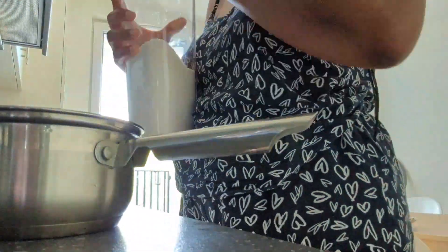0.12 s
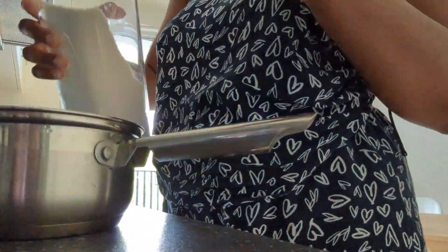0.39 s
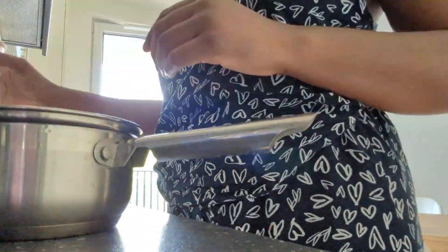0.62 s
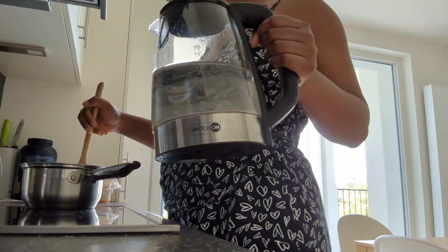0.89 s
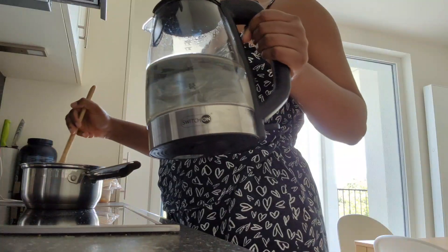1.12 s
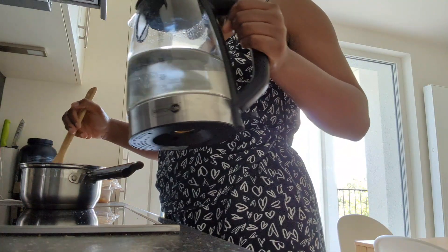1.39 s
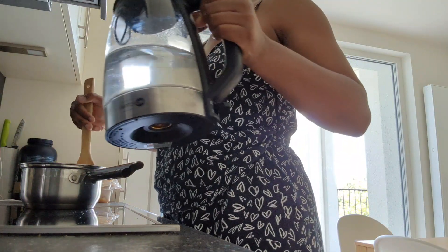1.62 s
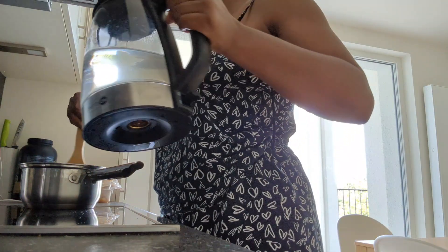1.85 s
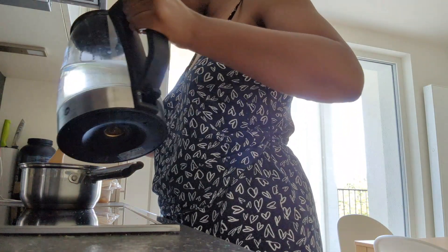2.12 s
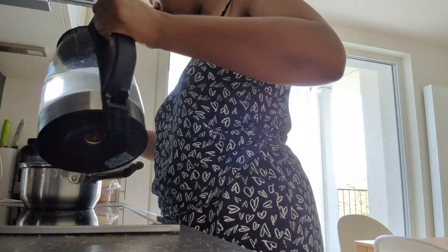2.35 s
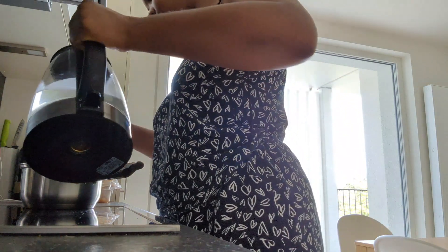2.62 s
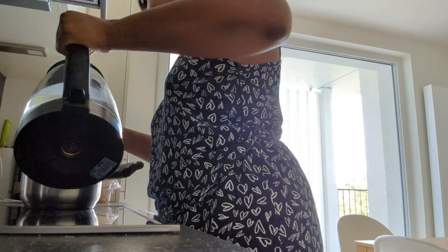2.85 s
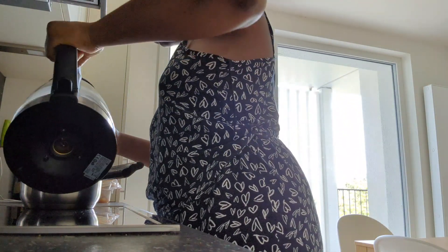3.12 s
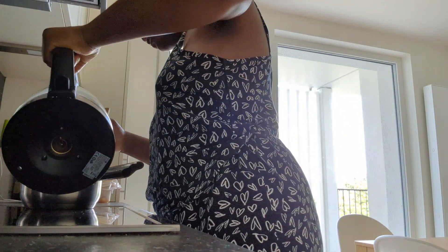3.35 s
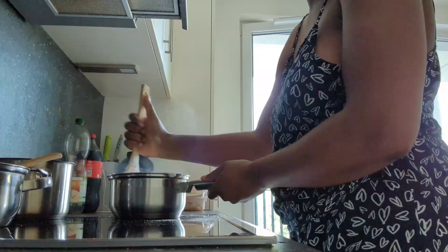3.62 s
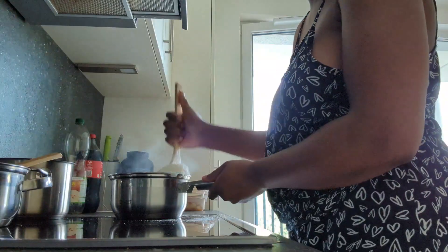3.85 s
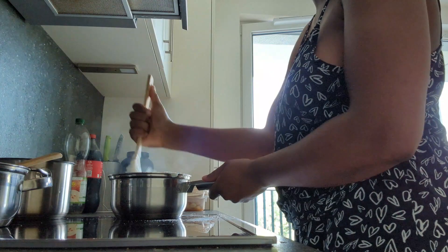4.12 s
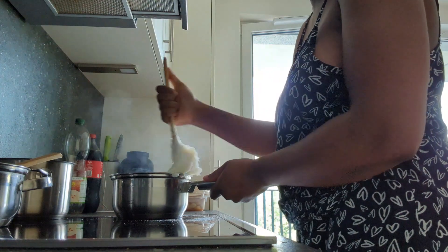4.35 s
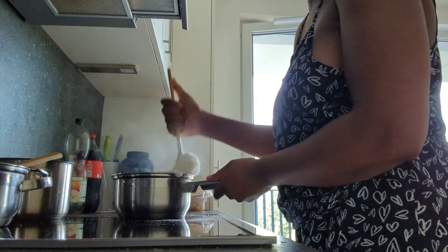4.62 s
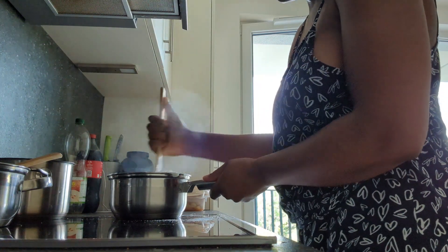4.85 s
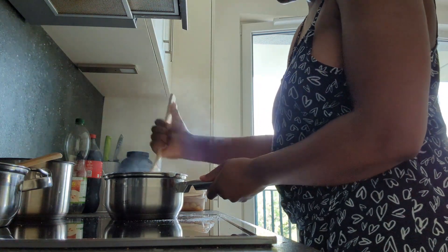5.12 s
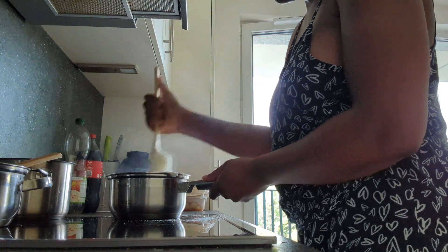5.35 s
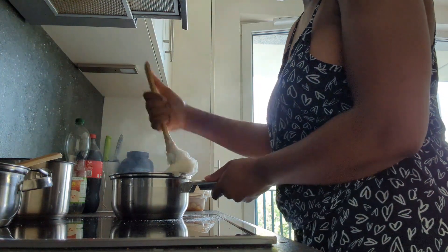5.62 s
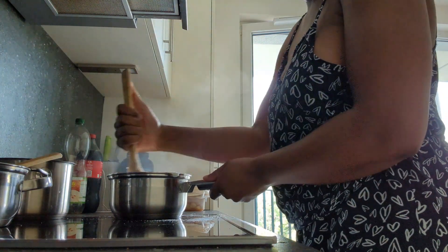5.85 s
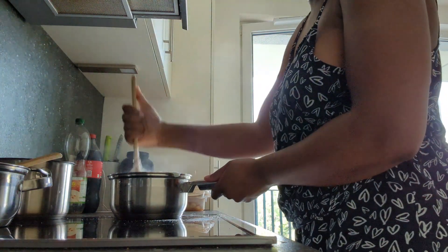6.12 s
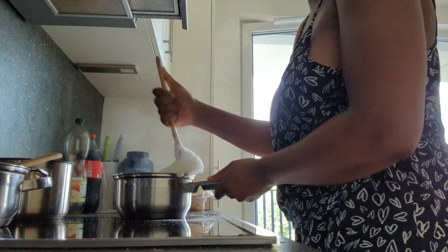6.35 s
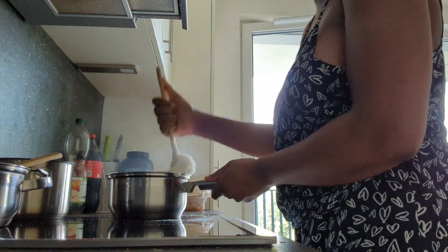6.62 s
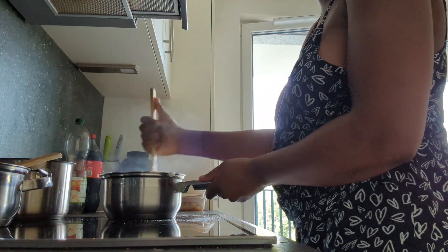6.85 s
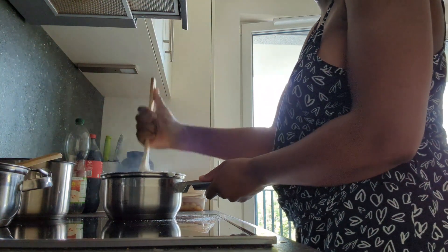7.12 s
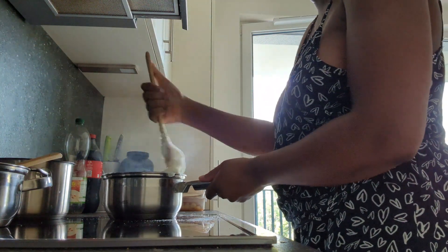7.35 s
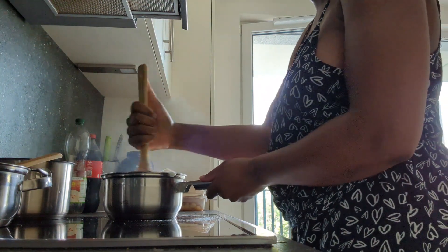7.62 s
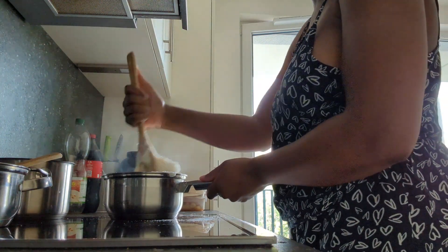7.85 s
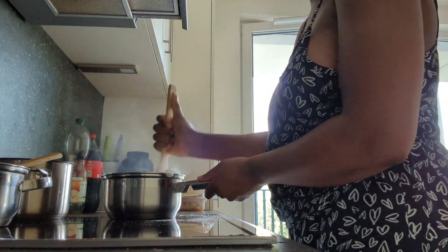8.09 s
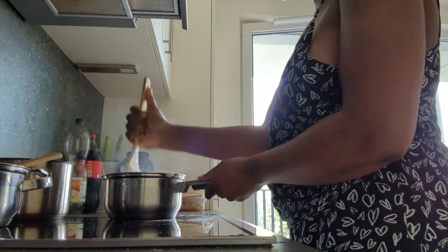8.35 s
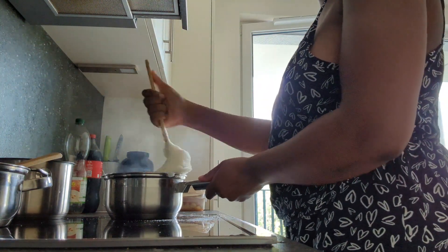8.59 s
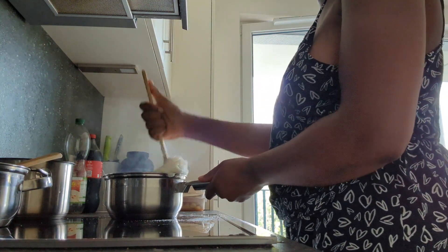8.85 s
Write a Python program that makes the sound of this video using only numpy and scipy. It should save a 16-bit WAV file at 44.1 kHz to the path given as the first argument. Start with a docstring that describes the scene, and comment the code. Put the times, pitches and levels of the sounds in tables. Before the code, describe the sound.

A kitchen extractor fan roars steadily while a jar clinks and is set down, then a wooden spoon beats stiff dough in a steel pot.

```python
"""A kitchen extractor fan roars and hums through its duct, heard by a phone from three stands in turn, with abrupt jumps.
The roar is noise shaped by duct resonances; under it lie a steady mains tone and, from the second stand, a deep hum.
First a jar clinks, scrapes and is set down: struck modes and grainy friction noise. Later a wooden spoon beats
dough in a steel pot: sagging deep tones thump the hob, and now and then the pot wall rings. Bright ticks dot the scene."""
import sys
import numpy as np
from scipy import signal
from scipy.fft import rfft, irfft, next_fast_len
from scipy.io import wavfile
from scipy.ndimage import uniform_filter1d

SR = 44100
rng = np.random.default_rng(int(sys.argv[2]) if len(sys.argv) > 2 else 0)


def attenuation_scalar(level_db):
    """Turn a level in dB into a linear amplitude multiplier (20 dB per decade)."""
    decades = np.asarray(level_db, float) / 20
    return 10 ** decades


def store_wav(level_fs):
    """Save 16-bit WAV to argv[1]."""
    pcm = np.round(np.clip(np.atleast_2d(level_fs), -1, 1) * 32767)
    wavfile.write(sys.argv[1], SR, pcm.T.astype(np.int16))


N = 395882

TIME = np.arange(N) / SR  # s
SIZE = next_fast_len(N)
FREQ = np.arange(SIZE // 2 + 1) * SR / SIZE + 1e-3  # Hz, kept above zero for the logarithm

# The three stands: [start t/s, air level/dB, mains tone level/dB, left port lag/samples]
STANDS = [(0, -29, -51, 1.7), (0.7986, -33, -46, 10), (3.633, -26.5, -44, 6.5)]
# Broad colour of the air noise: [f/Hz, density/dB per Hz at stand 1, at stand 2, at stand 3]
AIR_COLOUR = [(30, -13, -31, -29), (42, -2, -9, -11), (60, -7.5, -9, -5.5), (91, 0.5, -4, -1),
              (207, -3.5, -13.5, -3), (264, -13.5, -16, -10.5), (408, -12.5, -16, -15),
              (738, -14.5, -19.5, -13.5), (1235, -15, -25.5, -18.5), (2400, -30, -28.5, -23.5),
              (3340, -39, -39, -32.5), (4980, -46, -46, -39), (10500, -58, -57.5, -47),
              (15700, -57, -58, -50)]
# Duct and room resonances, dips negative: [f/Hz, width/Hz, level/dB at stand 1, at stand 2, at stand 3]
DUCT_RESONANCES = [(73.2, 5.5, 8.5, 8, 5.5), (83.7, 6, -7, 1.5, -3), (104, 9.7, -3.5, 2.5, -2),
                   (123.4, 10.8, 1, 7, 4.5), (150, 5.2, -1, -1, -9.5), (162, 7.4, -3, 5.5, 7),
                   (168.7, 6.8, 0, -2, -5), (189, 9.4, -2.5, 8.5, 5.5), (211, 8.3, -4, 6.5, 0.5),
                   (234.6, 13.3, -2, -9.5, -5.5), (259.6, 20.5, 7.5, 5, 2), (367.5, 61, 1.5, 2.5, 7.5),
                   (404, 5.7, -6, 10.5, 8), (502, 108, 3.5, -5.5, -4), (623, 41, -2, -5.5, -9),
                   (682.4, 27, 6, 5.5, 5.5), (725, 13.6, 2.5, 8, 9), (773, 10.6, 7, -5, -5),
                   (830, 41, -1.5, 5.5, 3), (952, 120, -1.5, -1.5, -2), (1105, 127, 1, 6.5, 5),
                   (1273, 45, -8, -2, -9), (1356, 59, 2.5, 5.5, 3), (1495, 7.4, 7, 6.5, 6.5),
                   (1637, 91, -13, -3, -2.5), (1734, 5.2, -7, -6, 11.5), (1837, 89, 6.5, 0, 4),
                   (1967, 6.3, 7, 4, 10), (2286, 86, -8, 0.5, 5.5), (3330, 570, 5.5, 4, 4),
                   (6380, 180, -4, -3, -3.5), (8000, 2200, 2, 2.5, 2), (9100, 2500, 2.5, 2.5, 1.5),
                   (11080, 860, 6, 5.5, 4.5)]
# Level of the deep hum, wavering irregularly, at times within a tenth of a second: [t/s, level/dB]
HUM_LEVEL = [(.8, -39), (.93, -30), (1.5, -37), (1.71, -28), (1.87, -35), (2.4, -38), (3.1, -30),
             (3.62, -44), (3.64, -34), (4.45, -27.5), (4.8, -32.5), (5.56, -26), (5.78, -32.5),
             (6.1, -26.5), (6.75, -31.5), (7.2, -28), (8.5, -35), (8.6, -22), (8.98, -34)]
# Brief dip of the fan at the first jump between stands: (from t/s, to t/s, level/dB)
FAN_DIP = (.7984, .8163, -6)
# Likeness of the two ports, negative = opposed: [f/Hz, likeness/-1 to 1 at stand 1, likeness later]
PORT_LIKENESS = [(100, .98, 0.97), (200, 0.88, 0.98), (400, 0.68, 0.84), (604, 0.76, 0.67),
                 (850, 0.53, 0.65), (1190, 0.12, 0.34), (1510, .38, -0.36), (2260, 0.14, -0.26),
                 (3200, -0.15, -0.19), (4500, -0.0072, -0.17), (7000, -.04, -0.11), (10500, -0.049, 0.0084),
                 (15000, .03, -.07)]
# Balance of the two ports: [f/Hz, left minus right level/dB]
PORT_BALANCE = [(60, -2), (110, -2), (200, -3.5), (380, -1.5), (700, -2), (1290, 1), (2380, 3.5), (4400, 2),
                (8120, -2.5), (15000, -1.5)]
# Contacts of the scraping jar: [t/s, level/dB, fade/dB per s]
SCRAPE_CONTACTS = [(0, -31.5, 250), (.43, -29, 430), (.466, -23, 1200), (.476, -27, 900), (.486, -28, 600),
                   (.52, -30.5, 700), (0.544, -35, 500), (.66, -32, 350)]
# Colour of the scrape: [f/Hz, density/dB per Hz]
SCRAPE_COLOUR = [(150, -30), (300, -1), (600, -5), (1300, -5.5), (2200, -9), (3300, -19.5), (4700, -29),
                 (5800, -33), (7300, -36), (15000, -53)]
# Blows on the jar, of the jar on the worktop, on the pot wall:
# [t/s, peak level before the tail/dB, contact/ms, favoured f of the struck spot/Hz]
JAR_CLINKS = [(.4216, -18, 0.023, 9000), (.4224, -7.5, 0.046, 1000), (.4243, -7.5, 0.079, 700)]
WORKTOP_THUDS = [(.6572, -14, .9, 150), (.6582, -7.5, 0.28, 350), (.6625, -12.5, 0.34, 700),
                 (.6755, -20, .5, 350), (.690, -22, .4, 450)]
POT_KNOCKS = [(4.002, -13.5, 0.11, 2000), (4.88, -18.5, 1.4, 350), (5.506, -18, 1.8, 250),
              (5.997, -20.5, 0.26, 900), (6.4143, -15.5, 0.076, 2100), (6.89, -22, 0.31, 900),
              (6.9175, -21, 0.085, 2950), (7.047, -24, 0.064, 2900), (7.5755, -15.5, 0.048, 2400)]
# Ringing modes of the jar, the worktop and the pot: [f/Hz, level/dB, t60/s]
JAR_MODES = [(504, 1.5, 0.0075), (1230, -2.5, 0.015), (1550, -8.5, 0.0097), (2250, -18, .015),
             (2900, -7.5, 0.019), (3320, -12, 0.014), (4050, -6, 0.017), (5130, -14, 0.014),
             (6480, -4, 0.015), (7100, -7, 0.016), (7840, -7, 0.015), (8670, -8, .015), (9600, 0, .015),
             (11240, -9, 0.014), (13000, -9, .015), (14400, -7, .015)]
WORKTOP_MODES = [(70, -18, 0.087), (129, 6, 0.028), (192, 3, 0.042), (310, 9.5, 0.035), (410, 5, 0.041),
                 (490, 2.5, 0.037), (650, 4, 0.049), (880, -2, 0.044), (1100, -1, 0.042), (1430, -1, 0.038),
                 (2000, -16, .025), (2444, -18, .03)]
POT_MODES = [(191, -14, 0.093), (360, 0, 0.032), (682, 4.5, 0.031), (1035, -0.5, 0.069), (1400, -3, 0.016),
             (1767, -8.5, 0.026), (2210, 0, 0.017), (2900, -1.5, 0.018), (3900, -6, 0.012),
             (5532, -20, 0.0094), (7500, -7, .008)]
# Small bright ticks and fizzes: [t/s, peak level/dB, f that sets the band/Hz, decay constant/ms]
TICKS = [(1.9663, -32, 7500, 3.8), (3.404, -50, 11980, 5.8), (3.4708, -43, 7400, 3.6),
         (3.516, -37, 6460, 1.28), (3.5238, -39, 7610, 2.7), (4.922, -37, 10500, 13),
         (5.932, -37, 11000, 5), (5.996, -26, 4500, 2.5), (7.705, -38, 13000, 8), (8.038, -28, 8000, 5)]
# Strokes that shake the hob: [t/s, drive level/dB]
HOB_STROKES = [(3.969, -23), (4.224, -32), (4.596, -33), (4.888, -19), (5.201, -28), (5.517, -16.5),
               (5.876, -25), (6.269, -26), (6.589, -21), (6.895, -18.5), (7.249, -26), (7.612, -27),
               (8.44, -31)]
# Steps of the waveform around the jumps between stands: [t/s, step/full scale]
WAVE_STEPS = [(0.7983, -0.05), (.8028, -0.022), (0.8163, -0.042), (3.6312, -0.03), (3.634, -0.063),
              (3.6421, 0.081)]


def table(points, axis=1):
    """One column of (Hz, value, ..) rows, read at every frequency along a log axis."""
    columns = np.transpose(points)
    return np.interp(np.log(FREQ), np.log(columns[0]), columns[axis])


def coloured(db):
    """Noise of rms 1, its spectrum shaped in dB per Hz."""
    noise = irfft(rfft(rng.standard_normal(SIZE)) * attenuation_scalar(db), SIZE)[:N]
    return noise / np.std(noise)


def walk(rate):
    """Random levels drawn rate times a second and slewed from one to the next; spread about 0.4."""
    hold = int(SR / rate)
    steps = np.repeat(rng.standard_normal(N // hold + 1), hold)
    return 0.48 * uniform_filter1d(steps, hold)[:N]


def ports(direct, diffuse, lag, axis=2):
    """Two microphone ports: mostly alike in the bass, where the left hears it lag samples later, unlike in the treble."""
    like = np.clip(table(PORT_LIKENESS, axis=axis), -1, 1)
    tilt = attenuation_scalar(table(PORT_BALANCE) / 2)
    direct, diffuse = rfft(direct, SIZE), rfft(diffuse, SIZE)
    # part of the difference is the same sound arriving off nearby surfaces, the rest is diffuse
    near = rng.standard_normal(1024) * np.exp(-TIME[:1024] / 0.01)
    near = rfft(near / np.sqrt(np.sum(near ** 2)), SIZE)
    near_share = 0.24  # of the power
    difference = np.sqrt(near_share) * direct * near + np.sqrt(1 - near_share) * diffuse
    shared = np.sqrt((1 + like) / 2) * direct
    own = np.sqrt((1 - like) / 2) * difference
    delay = lag / SR / (1 + (FREQ / 700) ** 2)  # s, shrinking above 700 Hz
    left = (shared + own) * np.exp(-2j * np.pi * FREQ * delay)
    return irfft(np.array([left * tilt, (shared - own) / tilt]), SIZE)[:, :N]


def add(out, s, sound):
    """Mixes a short sound in at s seconds."""
    i = int(s * SR)
    out[..., i:i + sound.shape[-1]] += sound[..., :N - i]


def blows(events, modes, crack_db, tail_db, tail_s, spot_db_per_octave):
    """Each blow cracks, pushes for its contact time and rings the modes; the walls return a short noisy tail."""
    out, t = np.zeros((2, N)), np.arange(SR // 4) / SR
    hz, db, t60 = np.transpose(modes)[:, :, None]
    # neighbouring modes start in opposite directions; low ones take longer to build up
    sign = -(-1) ** np.arange(len(modes))[:, None]
    build_up = 1 - np.exp(-t * hz * 9.3)
    rings = sign * build_up * attenuation_scalar(db - 60 * t / t60) * np.sin(2 * np.pi * hz * t)
    for s, peak_db, contact_ms, spot_hz in events:
        octaves_away = np.abs(np.log2(hz / spot_hz))
        ring = np.sum(rings * attenuation_scalar(-spot_db_per_octave * octaves_away), axis=0)
        crack = attenuation_scalar(crack_db) * rng.standard_normal(len(t)) * np.exp(-t / 0.0023)
        push = np.exp(-t[:400] / (max(contact_ms, 0.01) / 1000))
        hit = signal.fftconvolve(ring + crack, push)[:len(t)]
        hit = hit * attenuation_scalar(peak_db) / np.max(np.abs(hit))
        # the tail begins after 5 ms and is duller than the blow
        walls = rng.standard_normal((2, len(t))) * attenuation_scalar(-60 * t / tail_s) * (t > 0.005)
        walls = signal.lfilter([1], [1, -0.5], walls)
        walls = walls / np.sqrt(np.sum(walls[0] ** 2))
        tail = signal.fftconvolve(hit[None], walls)[:, :len(t)]
        add(out, s, hit + attenuation_scalar(tail_db) * tail)
    return out


def jumps():
    """The waveform steps suddenly and relaxes within a few milliseconds."""
    out, t = np.zeros(N), np.arange(SR // 50) / SR
    for s, step in WAVE_STEPS:
        add(out, s, step * np.exp(-t / 0.0021))
    return out


def ticks():
    """Short bursts of band-passed noise that die away exponentially."""
    out, t = np.zeros((2, N)), np.arange(SR // 20) / SR
    for s, peak_db, hz, decay_ms in TICKS:
        edges = [hz * 0.3, min(hz * 1.12, 16000)]
        band = signal.butter(2, edges, "band", fs=SR, output="sos")
        noise = rng.standard_normal((2, len(t))) * np.exp(-1000 * t / decay_ms)
        burst = signal.sosfilt(band, noise)
        add(out, s, attenuation_scalar(peak_db) * burst / np.max(np.abs(burst)))
    return out


def scrape():
    """The jar's friction noise: each contact rises in milliseconds and fades, in dense grains of very uneven size."""
    rise_s = 0.0023  # ends at the listed time
    level = np.zeros(N)
    for s, db, fade in SCRAPE_CONTACTS:
        since = TIME - s
        level += attenuation_scalar(db - fade * np.maximum(since, 0)) * np.clip(1 + since / rise_s, 0, 1)
    grain = level * attenuation_scalar(4 * walk(700) + 5 * walk(250))
    colour = table(SCRAPE_COLOUR)
    return ports(grain * coloured(colour), grain * coloured(colour), 0, axis=1)


def jar_clinks():
    """Very short contacts ring the many quickly damped modes of the jar."""
    return blows(JAR_CLINKS, JAR_MODES, crack_db=-22, tail_db=-16, tail_s=0.12, spot_db_per_octave=4.4)


def worktop_thuds():
    """The jar is set down: longer contacts ring the low modes of the worktop."""
    return blows(WORKTOP_THUDS, WORKTOP_MODES, crack_db=-12.5, tail_db=-15, tail_s=0.089, spot_db_per_octave=4)


def pot_knocks():
    """The wooden spoon knocks the steel pot wall and rings its modes."""
    return blows(POT_KNOCKS, POT_MODES, crack_db=-13, tail_db=-11, tail_s=0.13, spot_db_per_octave=5.7)


def thumps():
    """Beating shakes the hob: a few cycles of deep tone swell and die, sagging in pitch."""
    out, t = np.zeros(N), np.arange(SR // 3) / SR
    hob_hz = 48.7  # where the pitch settles
    swell = t / 0.033 * np.exp(1 - t / 0.023)
    sagging_time = t + 0.0067 * (1 - np.exp(-t / 0.015))
    for s, db in HOB_STROKES:
        add(out, s, attenuation_scalar(db) * swell * np.sin(2 * np.pi * hob_hz * sagging_time))
    return ports(out, 0 * out, 6.5)


def hum():
    """A narrow-band hum near 101 Hz, its pitch and level wavering by chance on top of the listed levels."""
    centre_hz, width_hz = 101.1, 11.3
    depth = 0.68  # of the random beating, 1 = plain narrow-band noise
    band = -20 * np.log10(1 + (2 * (FREQ - centre_hz) / width_hz) ** 2)
    z = signal.hilbert(coloured(band), SIZE)[:N]
    tone = np.real(z) * (np.abs(z) + 1e-3) ** (depth - 1)
    s, db = np.transpose(HUM_LEVEL)
    level = attenuation_scalar(np.interp(TIME, s, db, left=-90))  # all but silent before the first point
    return level * tone / np.std(tone)


def fan():
    """Turbulent air through the duct resonances, a wavering deep hum and a steady mains tone, as each stand hears them."""
    out, deep = np.zeros((2, N)), hum()
    ends = [row[0] for row in STANDS[1:]] + [N / SR]
    for k, (start, air_db, mains_db, lag) in enumerate(STANDS):
        colour = table(AIR_COLOUR, axis=k + 1)
        for row in DUCT_RESONANCES:
            colour = colour + row[2 + k] / (1 + (2 * (FREQ - row[0]) / row[1]) ** 2)
        gust = attenuation_scalar(air_db + 0.5 * walk(6) + 0.76 * walk(25))
        mains = np.sqrt(2) * attenuation_scalar(mains_db) * np.sin(2 * np.pi * 49.8 * TIME)
        direct = gust * coloured(colour) + deep + mains
        heard = ports(direct, gust * coloured(colour), lag, axis=min(k + 1, 2))
        out += heard * ((TIME >= start) & (TIME < ends[k]))
    dip_start, dip_end, dip_db = FAN_DIP
    return out * attenuation_scalar(dip_db * ((TIME >= dip_start) & (TIME < dip_end)))


def scene():
    """Fan, jar handling and dough beating together, with the ticks and waveform steps."""
    handling = scrape() + jar_clinks() + worktop_thuds()
    beating = pot_knocks() + thumps()
    return fan() + handling + beating + ticks() + jumps()


def low_pass(x):
    """Removes everything above the highest recorded frequency."""
    return signal.sosfilt(signal.butter(12, 16540, fs=SR, output="sos"), x)


def record(dry):
    """The phone cuts the deepest bass and the top of the treble."""
    bass_cut = signal.butter(6, 38, "high", fs=SR, output="sos")
    top_cut = signal.ellip(10, 0.3, 70, 15780, fs=SR, output="sos")
    mix = signal.sosfilt(np.vstack([bass_cut, top_cut]), dry)
    return low_pass(mix)


dry = scene()
out = record(dry)
store_wav(out)
```